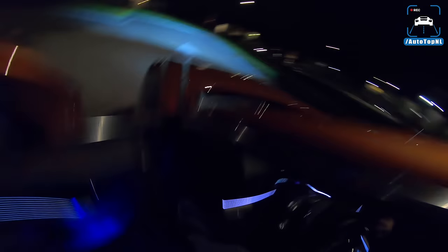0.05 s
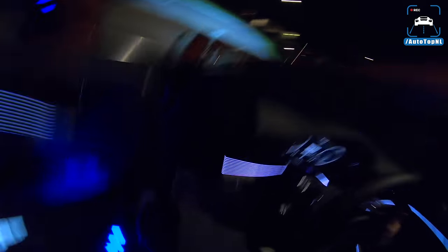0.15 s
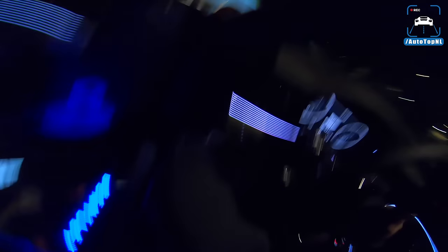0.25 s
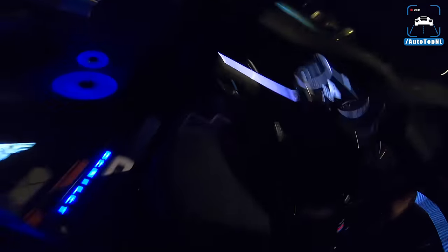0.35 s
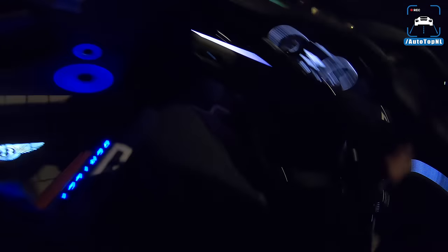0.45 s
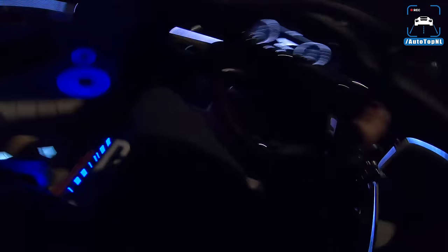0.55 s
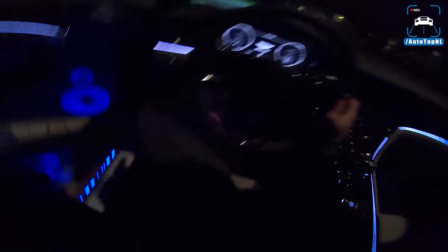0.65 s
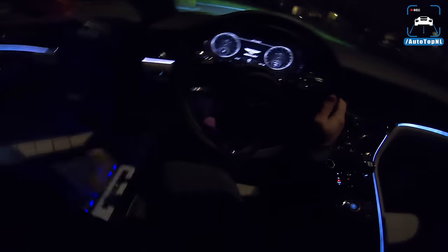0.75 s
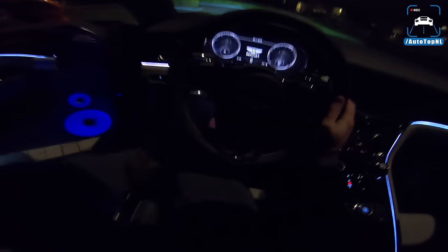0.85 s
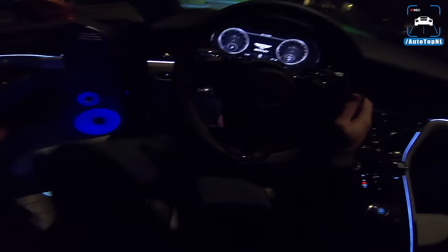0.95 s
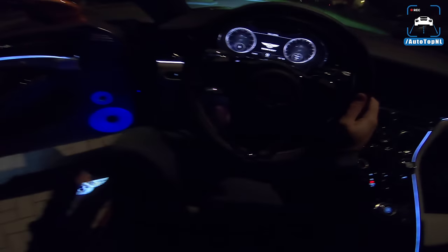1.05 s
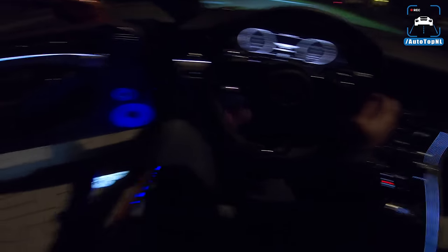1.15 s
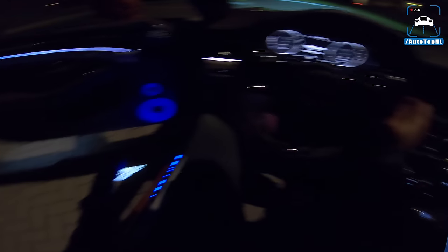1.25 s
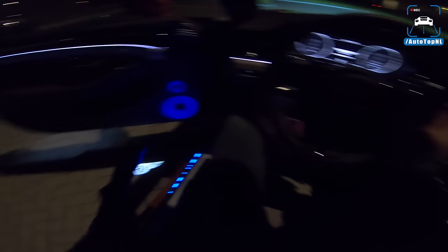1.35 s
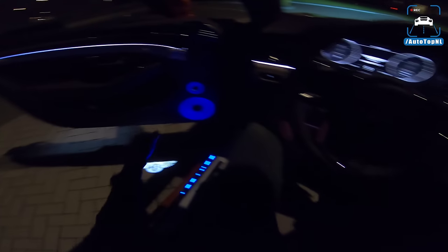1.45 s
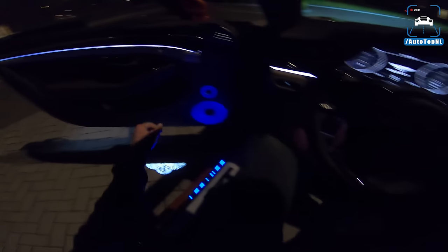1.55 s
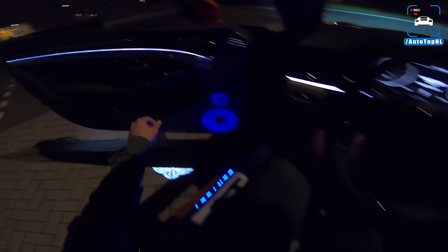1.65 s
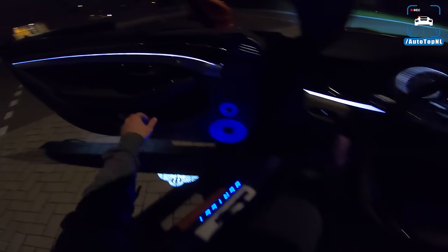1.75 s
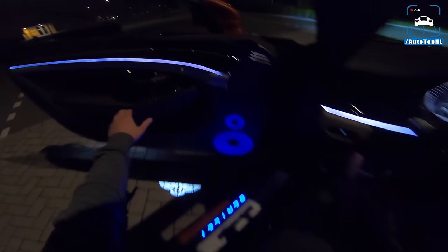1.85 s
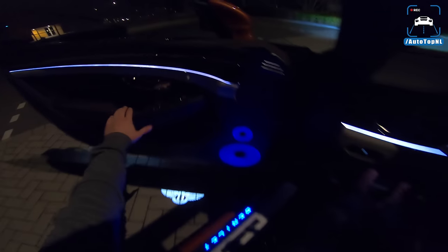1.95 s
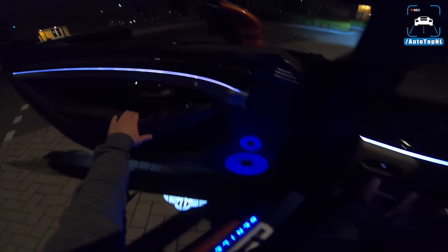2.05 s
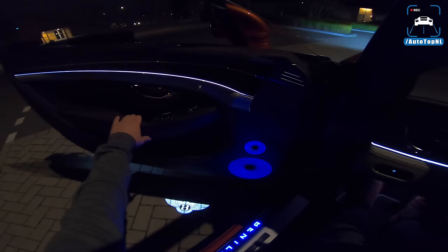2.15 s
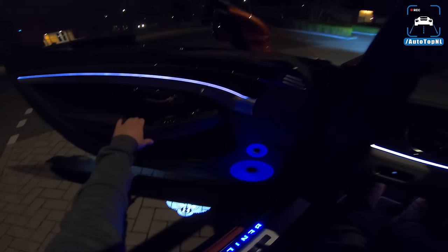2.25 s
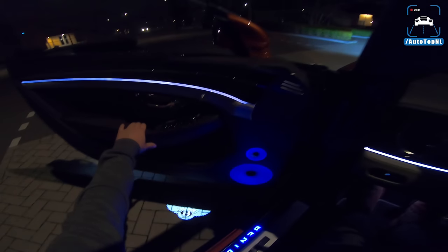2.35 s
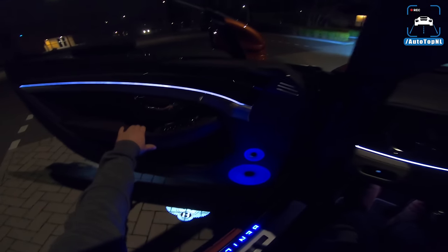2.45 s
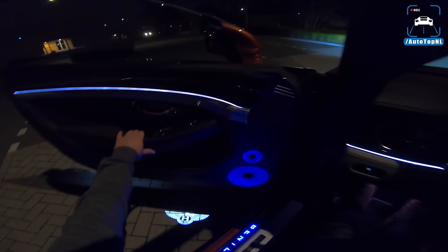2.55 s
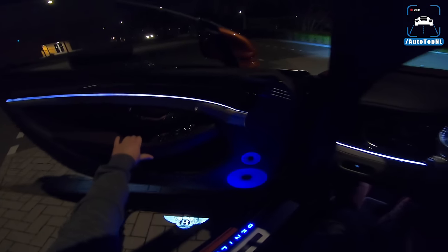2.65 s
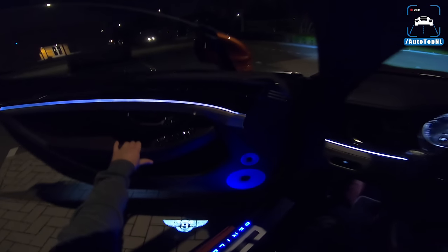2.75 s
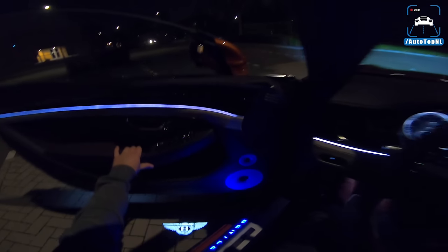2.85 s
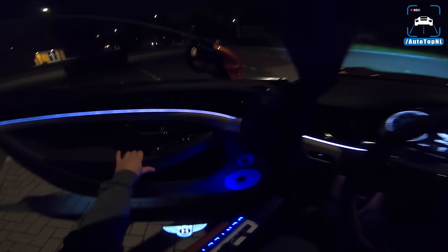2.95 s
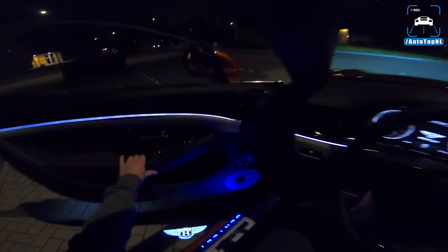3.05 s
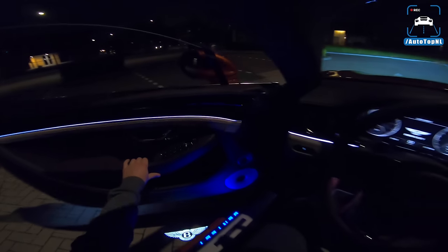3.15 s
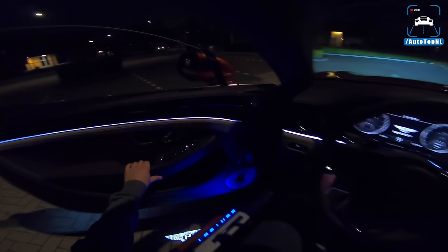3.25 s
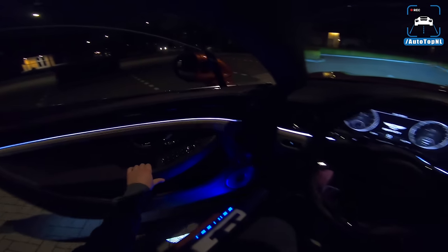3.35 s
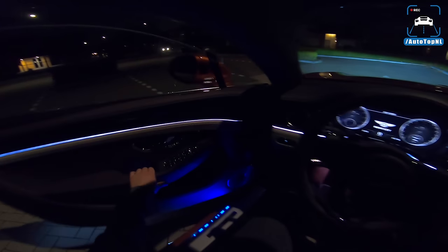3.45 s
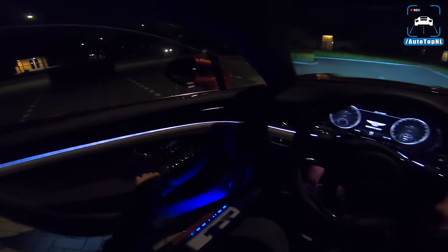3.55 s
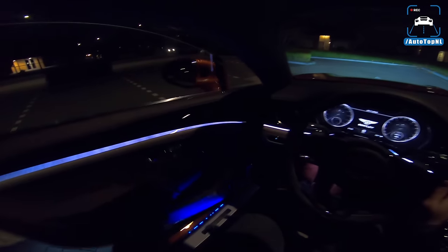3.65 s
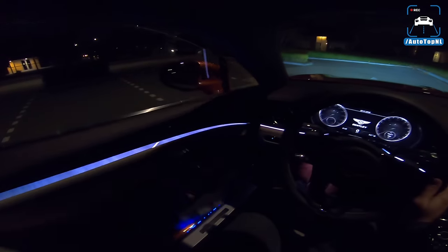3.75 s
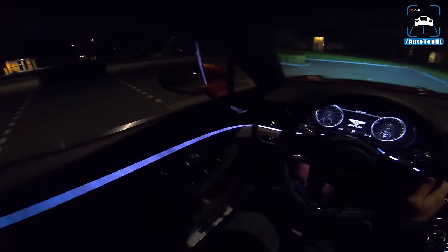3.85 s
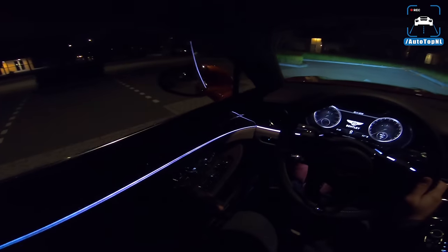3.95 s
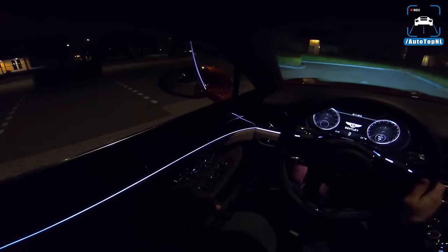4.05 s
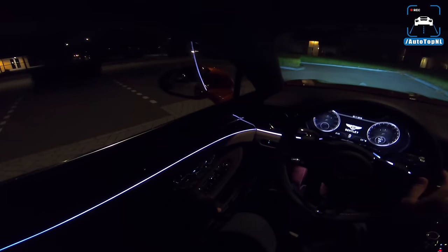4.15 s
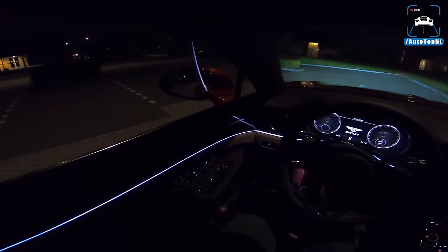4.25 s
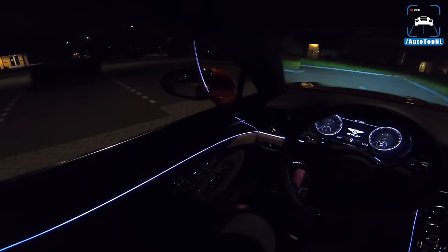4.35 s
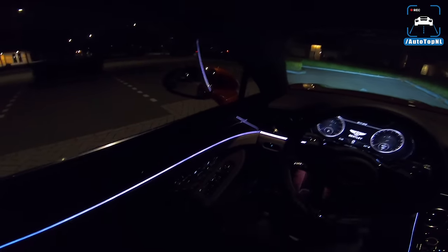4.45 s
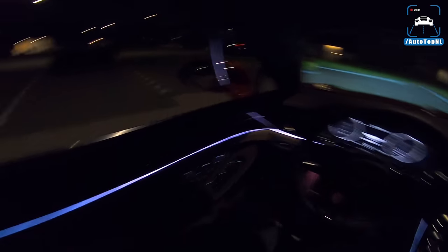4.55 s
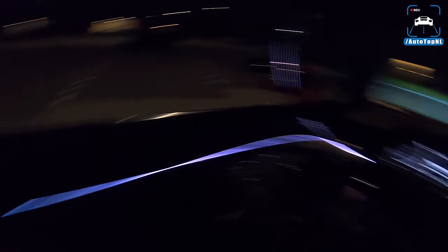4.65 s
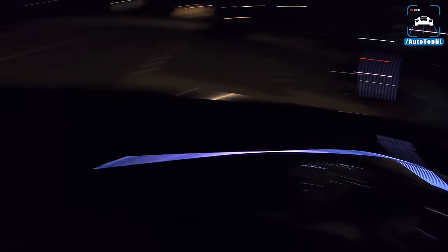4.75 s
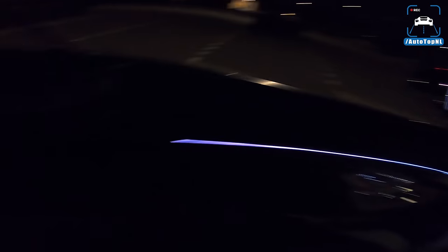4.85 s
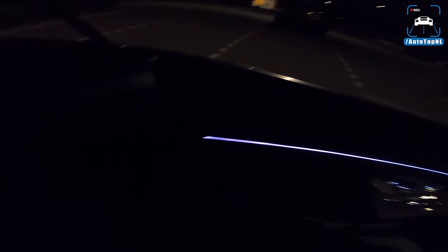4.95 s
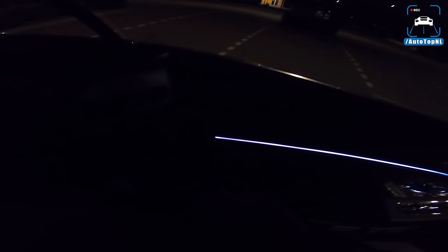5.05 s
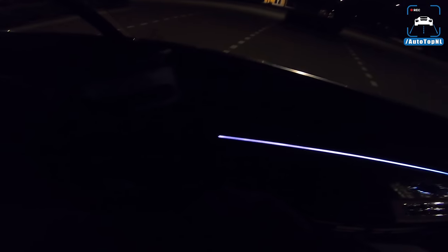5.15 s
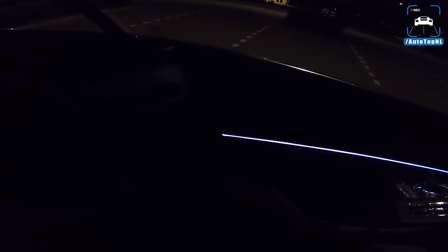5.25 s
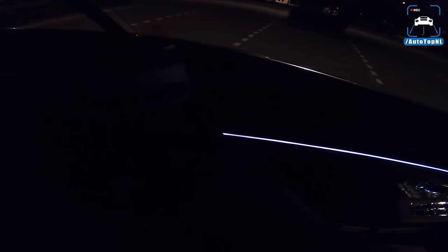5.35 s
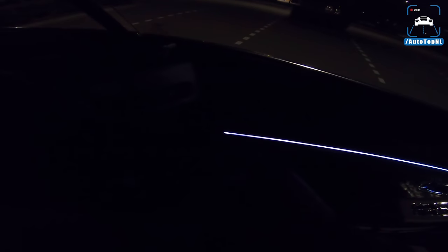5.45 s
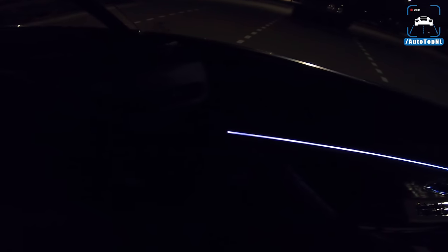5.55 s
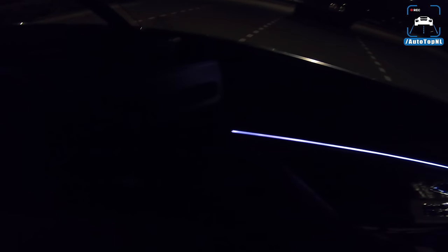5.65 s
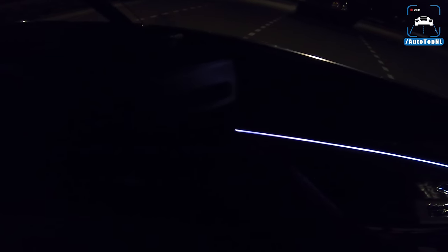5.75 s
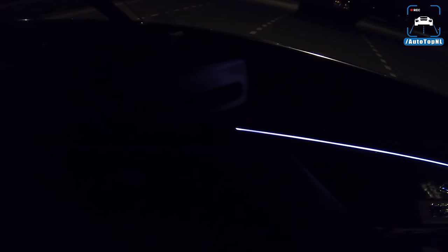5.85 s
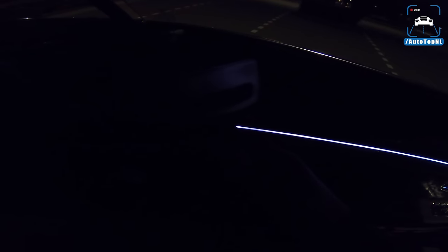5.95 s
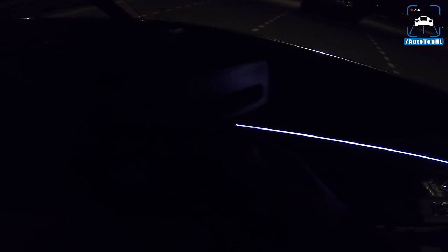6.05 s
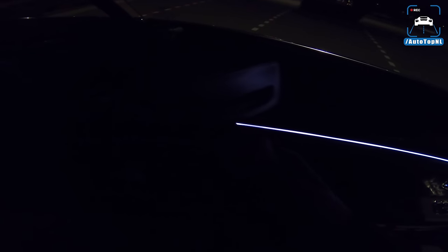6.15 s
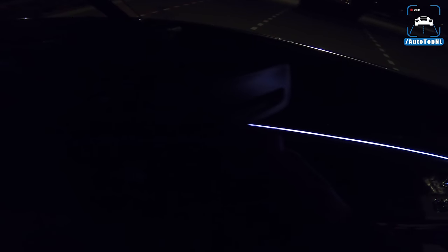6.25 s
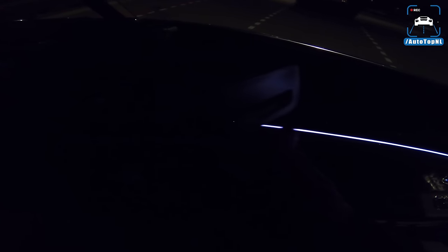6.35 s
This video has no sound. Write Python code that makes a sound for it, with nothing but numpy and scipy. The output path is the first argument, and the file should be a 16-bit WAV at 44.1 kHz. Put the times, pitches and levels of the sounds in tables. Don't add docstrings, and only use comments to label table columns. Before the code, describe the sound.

Muffled handling bumps, dull knocks and cloth swishes open the scene, with soft street hiss outside. A car drives off nearby, its low drone changing gear and fading. One loud, bassy door slam follows, with a short metallic latch and brief panel ring. Then it is very quiet inside: faint rubbing, tiny squeaks and taps, and a quiet electric motor with a thin gear whine, heard from the driver's head.

```python
import sys
import numpy as np
from scipy import signal
from scipy.fft import rfft, irfft, next_fast_len
from scipy.io import wavfile
from scipy.ndimage import uniform_filter1d

SR = 44100
rng = np.random.default_rng(int(sys.argv[2]) if len(sys.argv) > 2 else 0)


def to_wav(sig):
    pcm = np.clip(np.atleast_2d(sig), -1, 1) * 32767
    pcm = np.round(pcm).astype(np.int16)
    wavfile.write(sys.argv[1], SR, pcm.T)


def field_ratio(decibels):
    return 10 ** (np.asarray(decibels, dtype=float) / 20)


N = 282240
SEATED_S, SLAM_S = 1.46, 4.012


def unit(x):
    return x / np.sqrt(np.mean(x ** 2) + 1e-20)


def along(points, hz):
    f, v = np.transpose(points)
    return np.interp(np.log(hz + 1), np.log(f + 1), v)


def curves(rows):
    s, *columns = np.transpose(rows)
    return [np.interp(np.arange(N) / SR, s, c) for c in columns]


def gate(rows, fade=0.067):
    t = np.arange(N) / SR
    return np.clip(np.minimum(t - rows[0][0], rows[-1][0] + fade - t) / fade, 0, 1)


def wobble(rate):
    at = np.arange(N) * rate / SR
    knots = rng.standard_normal(int(at[-1]) + 2)
    k = at.astype(int)
    ease = (at - k) ** 2 * (3 - 2 * (at - k))
    return knots[k] + ease * (knots[k + 1] - knots[k])


def filtered(x, response):
    m = next_fast_len(x.shape[-1] + 8192)
    spectrum = rfft(x, m) * response(np.fft.rfftfreq(m, 1 / SR))
    return irfft(spectrum, m)[..., :x.shape[-1]]


def coloured(count, spectrum):
    return unit(filtered(rng.standard_normal(count), lambda hz: field_ratio(along(spectrum, hz))))


def tone(hz, drift, rate, flutter_db):
    phase = 2 * np.pi * np.cumsum(hz) / SR + drift * wobble(rate)
    return np.sqrt(2) * np.sin(phase) * field_ratio(flutter_db * wobble(rate))


def ring(modes, t, scatter_db=2):
    total = 0
    for hz, db, t60 in modes:
        level_db = db + rng.normal(0, scatter_db) - 60 * t / t60
        total = total + field_ratio(level_db) * np.sin(2 * np.pi * hz * t)
    return total


def add(track, s, sound):
    track[round(s * SR):][:len(sound)] += sound


# (time [s], body level [dB], latch level [dB], thud level [dB], seal hiss level [dB])
DOOR = [(3.985, -44, -59, -39.5, -49), (4.004, -21, -50.5, -41, -44), (4.0158, 1.5, -26, -23.5, -33),
        (4.028, -13, -42.5, -15.5, -27), (4.045, -19, -12, -23, -41), (4.059, -25, -30, -23, -35),
        (4.08, -17.5, -41, -28, -43), (4.095, -22, -50, -28, -50), (4.107, -24, -29, -31, -44),
        (4.15, -40, -50, -41, -58), (4.305, -58, -80, -55, -80)]
# (frequency [Hz], level [dB], time to fall 60 dB [s])
PANEL = [(72, -13, .75), (112, -20, .45), (156, -10, .16), (186, -16, .18), (270, -11, .06), (345, -7, .06),
         (440, -12, .04), (520, -6, .04), (600, -12, .03), (940, -14, .03)]
LATCH = [(990, -10, 0.043), (1430, 0, 0.02), (1620, 5.5, 0.014), (1780, 2, .014), (2050, -16, 0.023),
         (2380, -9, 0.02)]
# (frequency [Hz], level [dB per Hz])
THUD = [(59, -41.5), (100, -9), (172, -4), (344, -7.5), (750, -19.5), (1100, -35), (1430, -42.5),
        (2420, -120)]
SEAL = [(350, -32), (600, -4.5), (1140, -14.5), (1680, -12), (2100, -14), (4660, -24), (8710, -32.5),
        (15400, -56.5)]
SEAL_DULLS = 0.12


def door():
    track, t = np.zeros(N + SR), np.arange(SR // 2) / SR
    flex_hz = 200 + (850 - 200) * np.exp(-t / 0.0025)
    flex = field_ratio(4 - 60 * t / 0.024) * (1 - np.exp(-t / 0.001)) * np.sin(2 * np.pi * np.cumsum(flex_hz) / SR)
    for s, body_db, latch_db, thud_db, seal_db in DOOR:
        dull = SEAL_DULLS * (seal_db + 27)
        puff = filtered(rng.standard_normal(len(t)),
                        lambda hz: field_ratio(along(SEAL, hz) + dull * np.log2(1 + hz / 4000)))
        panel = field_ratio(-5.5) * (1 - np.exp(-t / 0.003)) * ring(PANEL, t)
        metal = field_ratio(body_db) * (flex + panel) + field_ratio(latch_db - 9.5) * ring(LATCH, t)
        thud = field_ratio(thud_db - 60 * t / 0.1) * coloured(len(t), THUD)
        hiss = field_ratio(seal_db - 60 * t / 0.11) * unit(puff)
        add(track, s, (1 - np.exp(-t / 0.0007)) * (metal + thud + hiss))
    return track[:N]


# (frequency [Hz], level [dB], time to fall 60 dB [s])
AIR = [(19.2, 4.8, .29), (22.1, -5.4, .6), (27.6, -18.7, 1.1), (31.2, -5, .35), (39.3, -4, .26),
       (61.2, -1, .175)]
AIR_LAG_S, AIR_RISE_S = 0.0084, 0.05
SETTLE_S, SETTLE_T60_S = 0.265, 0.2


def pressure():
    t = np.arange(N) / SR - SLAM_S
    build = np.sin(np.pi / 2 * np.clip((t + 0.075) / 0.055, 0, 1)) ** 2
    squeeze = field_ratio(-20) * build * np.exp(-(np.maximum(t, 0) / 0.008) ** 2)
    after = np.clip(t - AIR_LAG_S, 0, 1)
    settle = field_ratio(-60 * np.clip(t - SETTLE_S, 0, 0.03) / SETTLE_T60_S)
    return squeeze - (1 - np.exp(-after / AIR_RISE_S)) * settle * ring(AIR, after, scatter_db=0)


# (time [s], peak level [dB], frequency [Hz])
BUMPS = [(0.088, -18, 51), (0.109, -18.5, 157), (0.234, -20.5, 156), (0.299, -21, 144), (0.459, -28, 51.1),
         (0.553, -21, 51.4), (0.656, -22.5, 154.5), (0.828, -21, 190), (0.855, -23.5, 153),
         (1.209, -13, 57), (1.238, -29, 51.1), (1.35, -15, 56.5), (2.273, -22, 70.5), (2.508, -35, 158),
         (4.641, -28.5, 176), (4.683, -25, 51.1), (4.739, -35, 278), (4.755, -32, 140), (4.798, -26.5, 88),
         (5.03, -38, 150), (5.2, -41, 140), (5.155, -42, 235), (5.891, -39, 140)]
KNOCKS = [(.12, -15, 105), (.13, -17, 90), (.246, -20, 190), (.298, -29, 640), (0.372, -19, 700),
          (2.273, -21, 560), (2.484, -24, 600), (4.617, -36, 570), (4.83, -33, 640), (5.164, -39, 447),
          (5.446, -42, 320), (5.993, -32, 676)]
BUMP_T60_S, KNOCK_T60_S = 0.095, 0.015
# (end of swell [s], peak level [dB], time to fall 60 dB [s], tilt [dB per octave], swell [s])
RUSTLES = [(0.057, -52, 0.069, -3, 0.0027), (.125, -30, 0.053, 0, 0.034), (0.256, -34, 0.071, 3, 0.0079),
           (0.384, -35, 0.28, 4, 0.038), (.6, -42, 0.26, 1, .03), (.99, -44.5, 0.14, 2.5, .04),
           (1.38, -33, 0.049, 5.5, 0.0018), (1.392, -33, 0.048, 2.5, 0.0032), (2.1, -38.5, 0.59, 1.5, .06),
           (.109, -31, .02, 2, .002), (.09, -40, .03, 2, .002), (4.4, -60.5, 0.15, 12.5, 0.069),
           (4.55, -56, 0.5, 0, .06), (4.709, -45, 0.27, -5, 0.033), (4.741, -42, 0.046, 4, .016),
           (5.149, -62, 0.11, 6, 0.05), (5.22, -57, 0.024, 6, .2)]
# (frequency [Hz], level [dB per Hz])
CLOTH = [(530, -50), (900, -1), (1300, 2), (3700, -5.5), (5100, -14), (7460, -18), (13000, -41),
         (15400, -53)]
STREET = [(220, -22.5), (380, 1.5), (447, 1.5), (685, -1), (865, -7.5), (960, -20.5), (1250, -49.5),
          (2110, -120)]


def handling():
    track, t = np.zeros(N + SR), np.arange(SR // 3) / SR
    for s, db, hz, t60 in [(*b, BUMP_T60_S) for b in BUMPS] + [(*k, KNOCK_T60_S) for k in KNOCKS]:
        modes = [(hz, 0, t60), (1.4 * hz, -6, 0.5 * t60), (2.6 * hz, -9, 0.36 * t60)]
        add(track, s, field_ratio(db - 1.5) * (1 - np.exp(-t * hz / 0.4)) * ring(modes, t, scatter_db=0))
    for s, db, t60, tilt_db, swell in RUSTLES:
        crisp = filtered(rng.standard_normal(len(t)),
                         lambda hz: field_ratio(along(CLOTH, hz) + tilt_db * np.log2(hz / 2000 + 0.1)))
        puff = unit(crisp) + field_ratio(-11) * coloured(len(t), STREET)
        fibres = np.repeat(rng.standard_normal(len(t) // 100), repeats=100)
        grain_db = 4 * uniform_filter1d(fibres, size=15)
        shape = np.minimum(t / swell, 1) * field_ratio(-60 * np.maximum(t - swell, 0) / t60)
        add(track, s - swell, field_ratio(db - 10.5 + grain_db) * shape * puff)
    return track[:N]


# (time [s], main order [Hz], main order level [dB], level of its octave [dB])
PULL_OFF = [
    (.98, 135, -44, -46),
    (1.1, 142, -42, -46),
    (1.2, 136, -34, -48),
    (1.3, 128, -33, -40),
    (1.45, 128, -46, -46),
]
LOW_GEAR = [
    (1.55, 187, -50, -48),
    (1.86, 195, -52, -47),
    (1.97, 198, -34.5, -47),
    (2.1, 198, -31, -62),
    (2.21, 203, -36, -55),
    (2.28, 196, -44, -45),
]
HIGH_GEAR = [
    (2.5, 161.7, -40, -46),
    (2.55, 153.7, -30.5, -45),
    (2.75, 143.9, -24, -55.5),
    (2.87, 138.7, -24.5, -52),
    (2.98, 148.2, -26, -47),
    (3.22, 151.6, -26.5, -40.5),
    (3.46, 146.2, -25, -48.5),
    (3.67, 126.6, -45.5, -65),
    (3.75, 123, -55, -75),
]
# (time [s], frequency [Hz], level [dB])
EXHAUST = [(1.3, 208, -61), (1.6, 218, -41), (1.9, 228.2, -36.5), (2.1, 231.5, -39), (2.27, 233.8, -38.5),
           (2.4, 253, -54), (2.5, 239, -42), (2.65, 220.7, -45.5)]
BEAT_S = [2.95, 3.145, 3.235, 3.361]
BEAT_DB, BEAT_WIDTH_S = 9, 0.013


def engine():
    gears, t = list(LOW_GEAR) + list(HIGH_GEAR), np.arange(N) / SR
    hz, main_db, octave_db = curves(gears)
    main_db = main_db - BEAT_DB * sum(np.exp(-((t - s) / BEAT_WIDTH_S) ** 2) for s in BEAT_S)
    main = field_ratio(main_db) * tone(hz, 0.59, 25.02, flutter_db=1)
    third = field_ratio(-9) * (hz < 155) * tone(3 * hz, 0.98, 40, flutter_db=4)
    upper = field_ratio(octave_db) * (tone(2 * hz, 0.39, 24, flutter_db=3) + third)
    between = field_ratio(octave_db - 5) * (hz > 160) * (t > 2.1) * tone(1.55 * hz, 0.4, 24, flutter_db=3)

    off_hz, off_db, off_octave_db = curves(PULL_OFF)
    off = field_ratio(off_db) * tone(off_hz, 0.5, 25, flutter_db=2)
    off = off + field_ratio(off_octave_db) * tone(2 * off_hz, 0.6, 25, flutter_db=3)
    pipe_hz, pipe_db = curves(EXHAUST)
    pipe = field_ratio(pipe_db) * tone(pipe_hz, 0.19, 32, flutter_db=1)
    return gate(PULL_OFF) * off + gate(gears) * (main + upper + between) + gate(EXHAUST) * pipe


def whistle(rows, drift, rate, upper_db):
    hz, db = curves(rows)
    upper = field_ratio(-7) * tone(1.53 * hz, 1.5 * drift, rate, flutter_db=3)
    upper = upper + field_ratio(-10) * tone(2 * hz, 1.6 * drift, rate, flutter_db=-2)
    return gate(rows) * field_ratio(db) * (tone(hz, drift, rate, flutter_db=3.5) + field_ratio(upper_db) * upper)


# (time [s], brush rate [Hz], brush tone level [dB], # shaft orders level [dB], half orders under
# load level [dB])
MIRROR = [
    (5.2, 205, -58, -72, -90),
    (5.26, 223, -54, -72, -90),
    (5.41, 232, -54, -80, -90),
    (5.48, 305, -48, -80, -90),
    (5.6, 408, -49, -63, -80),
    (5.68, 476.8, -52, -66, -78),
    (5.9, 478.5, -50.5, -60.5, -70),
    (6, 460, -58, -60.5, -60),
    (6.2, 452, -64, -61, -60),
    (6.4, 450.6, -50.5, -64.5, -63),
]
# (multiple of brush rate, level [dB])
SHAFT_ORDERS = [(.3, 13.5), (.61, 8.5), (.82, 7.5), (2, -2)]
HALF_ORDERS = [(1.5, -1), (2.5, -4)]
# (time [s], frequency [Hz], level [dB])
GEAR = [(5.55, 3500, -72), (5.7, 3775, -67.5), (5.9, 3605, -63.5), (6, 3440, -62.5), (6.2, 3380, -62),
        (6.4, 3260, -62)]
FAN = [(4.8, 3040, -78), (5.1, 3010, -73), (5.35, 2990, -77), (5.55, 2950, -73), (5.8, 2925, -71),
       (6.4, 2870, -77)]


def mirror():
    hz, tone_db, shaft_db, half_db = curves(MIRROR)

    def orders(table):
        return sum(field_ratio(db) * tone(k * hz, 0.6, 38, flutter_db=3.5) for k, db in table)

    motor = field_ratio(tone_db) * tone(hz, 0.25, 30, flutter_db=4)
    motor = motor + field_ratio(shaft_db) * orders(SHAFT_ORDERS) + field_ratio(half_db) * orders(HALF_ORDERS)
    gears = field_ratio(-1.5) * whistle(GEAR, 1.7, 360, upper_db=-1)
    return gate(MIRROR) * motor + gears + whistle(FAN, 1.7, 330, upper_db=-15)


# (start [s], end [s], frequency [Hz], width [Hz], level [dB])
SQUEAKS = [
    (4.16, 4.255, 8500, 1100, -72),
    (4.2, 4.25, 4500, 1500, -75),
    (4.85, 5.1, 6950, 150, -76),
    (5, 5.22, 3730, 150, -72),
    (5.11, 5.17, 4900, 300, -68),
    (5.1, 5.225, 7500, 300, -71),
    (5.12, 5.225, 6400, 400, -74),
    (5.535, 5.555, 5200, 150, -63),
]


def squeaks():
    track = np.zeros((2, N + SR))
    for start, end, hz, width_hz, db in SQUEAKS:
        u = np.linspace(0, 1, round((end - start) * SR))
        hiss = filtered(rng.standard_normal((2, SR // 3)), lambda f: 1 / (1 + ((f - hz) / width_hz) ** 2))
        swell = np.sqrt(u) * np.minimum(8 * (1 - u), 1)
        sound = field_ratio(db) * swell * unit(hiss[0] + 0.6 * hiss)[:, :len(u)]
        add(track[0], start, sound[0])
        add(track[1], start, sound[1])
    return track[:, :N]


def together(*dbs):
    return 10 * np.log10(sum(field_ratio(db) ** 2 for db in dbs))


# (time [s], heave level [dB], seat boom level [dB], trim level [dB], length [s])
MOVES = [(.13, -27.5, -33.5, -44.5, 0.073), (.26, -33.5, -32, -48, 0.092), (.39, -32, -41.5, -42.5, 0.18),
         (.46, -33, -39.5, -46, .05), (.565, -28, -28.5, -48, 0.046), (.67, -27, -39.5, -67, 0.065),
         (.85, -37, -32, -47, 0.033), (1.22, -24, -37, -47.5, .1), (1.3, -32, -32, -47.5, 0.34),
         (1.73, -35, -39, -64, 0.15), (2.08, -34, -50, -54, 0.16), (2.19, -25.5, -48, -46, .12),
         (2.52, -33.5, -48, -55.5, 0.079), (2.8, -30, -54, -57, .12), (3.56, -38, -51, -45, 0.091)]
REACHES = [(4.635, -57, -49, -48, .04), (4.71, -36.5, -54, -56, 0.073), (4.745, -50, -38, -43.5, 0.067),
           (4.83, -42, -40, -41.5, 0.021), (4.9, -41, -49, -60, 0.092), (5, -45.5, -49, -57, 0.063),
           (5.2, -67, -52, -60, 0.087), (5.73, -57, -44, -54, .15), (5.98, -48, -54, -47.5, 0.34),
           (6.32, -40, -38.5, -61, .08)]
MOVE_EDGE_DB, RISE_SHARE = 16.5, 0.72


def moves():
    t, power = np.arange(N) / SR, np.full((3, N), 1e-12)
    for s, *dbs, length in list(MOVES) + list(REACHES):
        away = np.maximum(t - s, (s - t) / RISE_SHARE) / length
        power += field_ratio(np.array(dbs)[:, None]) ** 2 * field_ratio(-2 * MOVE_EDGE_DB * away)
    return 10 * np.log10(power)


# (time [s], exhaust drone level [dB], tyre roar level [dB])
CAR = [(0, -46.5, -47), (.6, -50, -46.5), (.78, -43, -58), (.95, -37, -52), (1.5, -34, -49),
       (1.9, -39, -44.5), (2.32, -37, -37), (2.7, -39.5, -45.5), (3.4, -39.5, -43), (3.9, -46, -50.5)]
# (from [s], strongest [s], to [s])
ARM_S = (4.6, 4.815, 5.22)
ARM_DB = [-51, -47.5, -58, -59.5]
ARM_RISE = [40, 15, 15, 52]
ARM_SAG = [52, 22, 15, 39]
QUIET_DB = [-66.5, -69.5, -80.5, -74]
MOTOR_DB = [-56, -46.5, -51.5, -59.5]
SPIN_UP_DB = [10, 5.7, 9, 21.3]
MOTOR_S, SPIN_UP_S = 5.206, 0.55


def levels():
    t = np.arange(N) / SR
    arm_db, rise, sag, quiet_db, motor_db, spin_up_db = [
        np.array(v)[:, None] for v in (ARM_DB, ARM_RISE, ARM_SAG, QUIET_DB, MOTOR_DB, SPIN_UP_DB)]
    heave_db, seat_db, trim_db = moves()
    drone_db, tyre_db = curves(CAR)
    jacket_db = trim_db - 4 - 60 * (t > SEATED_S)
    hiss_db = together(-49.5 - 2.5 * t, tyre_db - 16)
    outside = np.array([tyre_db + 2.5, drone_db, tyre_db, hiss_db])

    edge = np.clip(np.minimum(t - ARM_S[0], ARM_S[2] - t) / 0.037, -1, 0)
    arm = arm_db - np.maximum(sag * (t - ARM_S[1]), rise * (ARM_S[1] - t)) + 30 * edge
    spin = (t - MOTOR_S) / SPIN_UP_S
    motor = motor_db - spin_up_db * (1 - np.clip(spin, 0, 1)) - 30 * np.clip(-10 * spin, 0, 1)
    inside = together(quiet_db, arm, motor)
    body = np.array([heave_db, seat_db, trim_db, jacket_db])
    return together(np.where(t < SLAM_S, outside, inside), body)


def patchy(patchy_db, grain_db):
    z = signal.stft(rng.standard_normal((2, N)) * field_ratio(grain_db * wobble(300)), nperseg=512)[2]
    field = uniform_filter1d(rng.standard_normal(z.shape[1:]), size=10, axis=0)
    field = uniform_filter1d(field, size=6, axis=1)
    return signal.istft(z * field_ratio(patchy_db * unit(field)), nperseg=512)[1][:, :N]


# (frequency [Hz], side minus mid level [dB])
WIDE = [(60, -18.5), (130, -33), (290, -23.5), (640, -11), (1400, -1), (3090, -11.5), (6800, -1),
        (15000, 2)]


def rush(spectrum, pair):
    mid, side = filtered(pair, lambda hz: field_ratio(along(spectrum, hz) + [0 * hz, along(WIDE, hz) - 1]))
    return np.array([mid + side, mid - side]) / np.std(mid)


RUMBLE = [(7.1, -32.5), (12, -2), (50, 2.5), (97, -10), (108, -5.5), (115, 0), (150, -31), (250, -120)]
BOOM = [(59, -38.5), (100, -5), (135, 1.5), (238, 1), (370, -12), (450, -17.5), (580, -50), (990, -120)]
SHUT_BOOM = [(59, -36.5), (100, -12), (140, 2.5), (215, -8), (281, -2.5), (420, -18.5), (580, -61),
             (990, -120)]
CABIN = [(220, -25), (380, -1), (487, -8), (584, -10.5), (960, -17.5), (1250, -52), (2110, -120)]
TRAFFIC = [(530, -29.5), (900, -5.5), (1520, -5.5), (2190, -8.5), (2990, -7.5), (7460, -30), (11700, -46),
           (15400, -64.5)]
HUSH = [(530, -35), (900, -3.5), (1050, 0.5), (1360, -4), (4860, -11.5), (5740, -16), (7640, -14.5),
        (12900, -42), (15400, -52)]
SWISH = [(3000, -10), (8000, -3), (11000, -20.5), (15400, -44)]
FLOOR = [(35, -31), (60, -5), (91, -11.5), (147, -6.5), (188, -22), (410, -33), (2400, -54), (5280, -120)]
SWING_S = 2.56


def surroundings():
    t, seat, cut = np.arange(N) / SR, round(SEATED_S * SR), round(SLAM_S * SR)
    rumble_db, boom_db, street_db, hiss_db = levels()

    def both(before, after, pair):
        return np.hstack([rush(before, pair[:, :cut]), rush(after, pair[:, cut:])])

    rumble_db[:cut] -= 16 * np.clip((t[:cut] - 3.82) / 0.049, 0, 1)
    hiss_db = np.maximum(hiss_db, -74)
    pair = patchy(patchy_db=1.43, grain_db=0.4)
    low = rng.standard_normal((2, 2, N))
    body = field_ratio(rumble_db) * rush(RUMBLE, low[0]) + field_ratio(boom_db) * both(BOOM, SHUT_BOOM, low[1])
    street = field_ratio(street_db - 3.5) * both(STREET, CABIN, pair)
    hiss = np.hstack([rush(CLOTH, pair[:, :seat]), rush(TRAFFIC, pair[:, seat:cut]), rush(HUSH, pair[:, cut:])])
    swing = gate([(SWING_S,), (SLAM_S,)], fade=0.22) * (np.arange(N) < cut)
    swish = field_ratio(-72) * swing * rush(SWISH, pair[:, ::-1])
    floor = field_ratio(-55.5) * rush(FLOOR, low[1, :, ::-1])
    return body + street + swish + field_ratio(hiss_db) * hiss + floor


# (frequency [Hz], time to fall 60 dB [s])
ROOM = [(100, .4), (500, .14), (2000, .13), (10000, .12)]


def cabin(x):
    hz, t, z = signal.stft(rng.standard_normal((2, SR // 2)), SR, nperseg=256)
    side_db = along(WIDE, hz)[:, None] + 4
    z = z * field_ratio(-60 * t / along(ROOM, hz)[:, None] + [0 * hz[:, None], side_db])
    mid, side = signal.istft(z, SR, nperseg=256)[1]
    echo = np.array([mid + side, mid - side]) / np.linalg.norm(mid)
    return signal.fftconvolve(x[None], echo, axes=1)[:, :N]


def scene():
    slam, small = door(), handling()
    near = engine() + mirror() + pressure() + slam + small
    return surroundings() + squeaks() + near + cabin(field_ratio(-9.5) * slam + field_ratio(-5.5) * small)


def low_pass(x):
    return signal.sosfilt(signal.butter(12, 15550, fs=SR, output="sos"), x)


# (frequency [Hz], left minus right level [dB])
LEAN = [(60, 0.5), (130, 0), (290, 0.5), (640, 2.5), (1400, 3.5), (3090, 1), (6800, -1.5), (15000, -0.5)]
# (time [s], side gain [dB])
STEREO = [(2.2, -45.5), (2.35, -21), (2.5, -17), (2.7, -2.5), (3.4, -4), (3.8, 4)]


def record(dry):
    left, right = filtered(dry, lambda hz: field_ratio(along(LEAN, hz) / 2 * np.array([[1], [-1]])))
    mid, side = (left + right) / 2, (left - right) / 2 * field_ratio(curves(STEREO)[0])
    ports = np.array([mid + side, mid - side]) * np.minimum(np.arange(N) / 200, 1)
    ports = ports / (1 + np.abs(ports / 0.96) ** 6) ** (1 / 6)
    return low_pass(ports)


dry = scene()
out = record(dry)
to_wav(out)
```